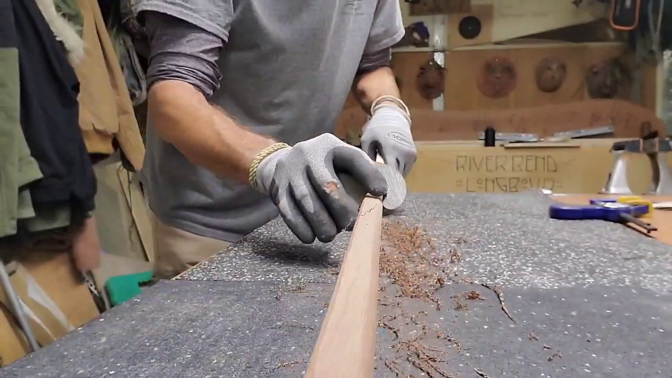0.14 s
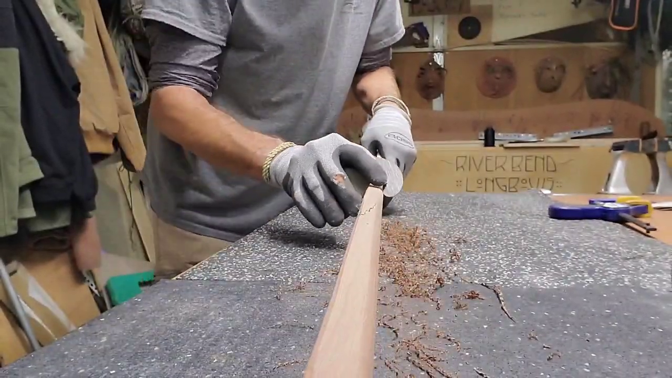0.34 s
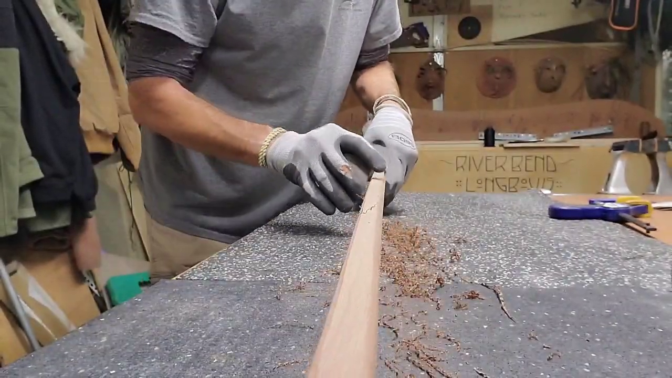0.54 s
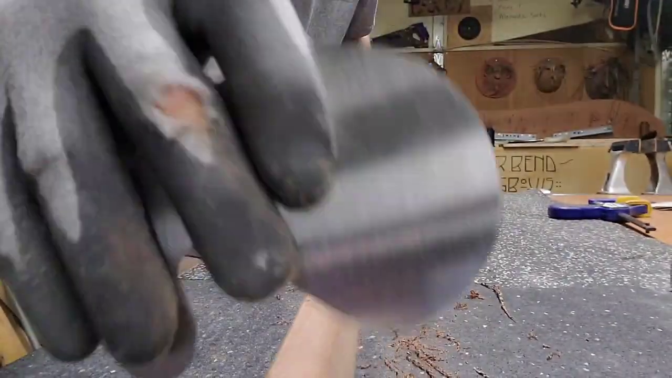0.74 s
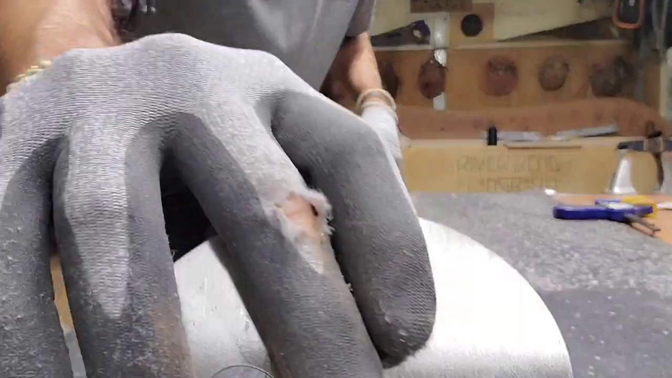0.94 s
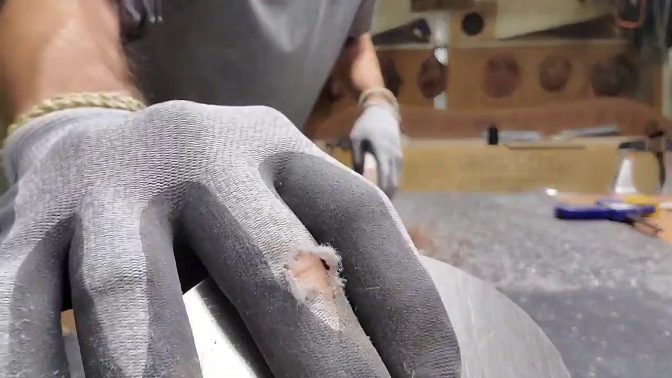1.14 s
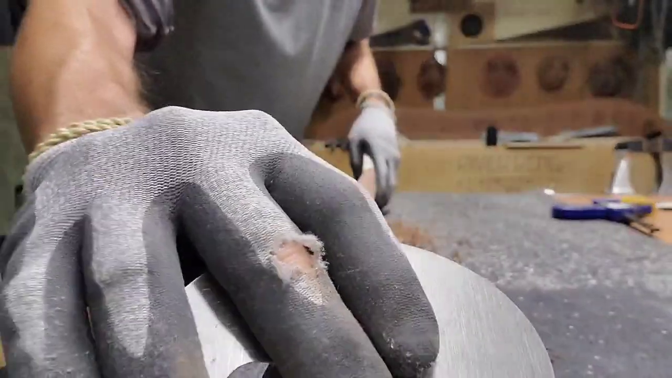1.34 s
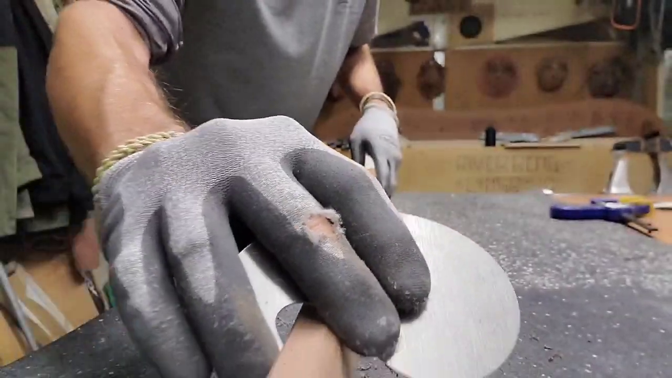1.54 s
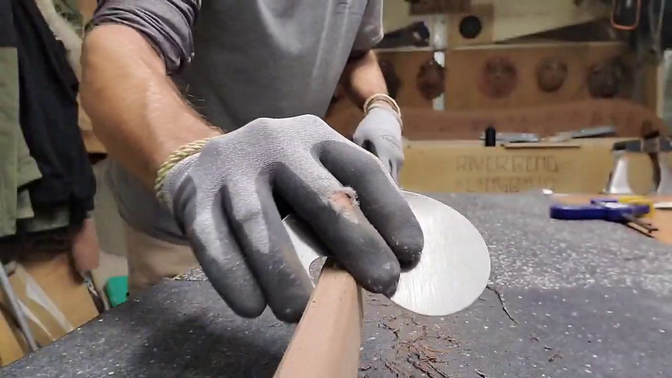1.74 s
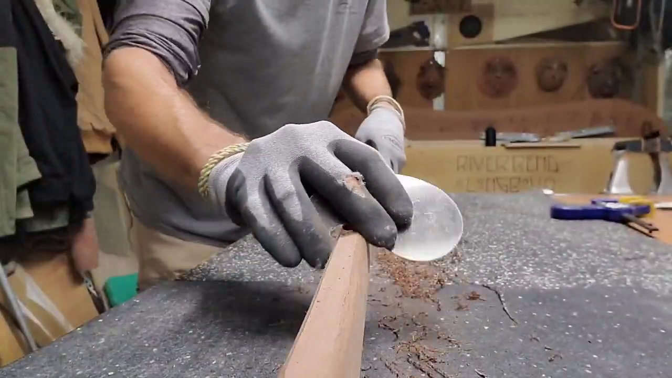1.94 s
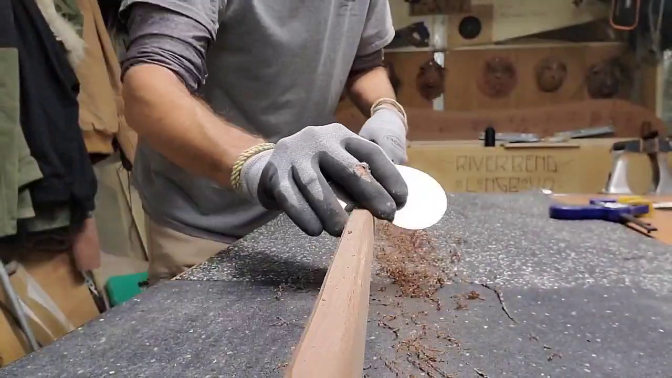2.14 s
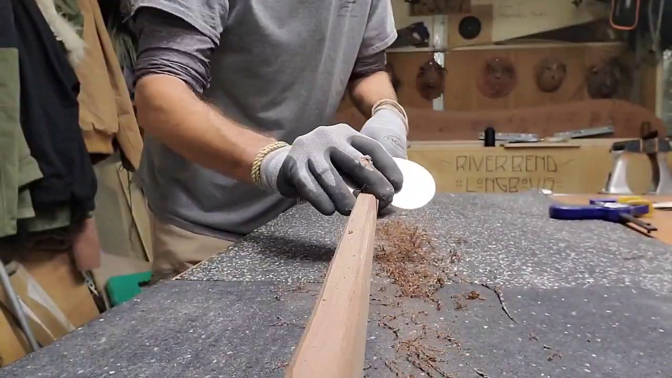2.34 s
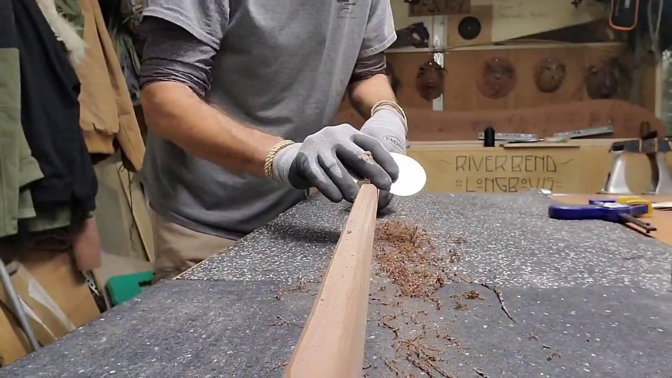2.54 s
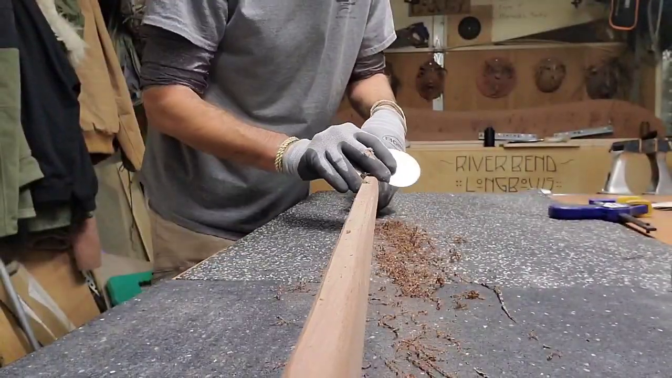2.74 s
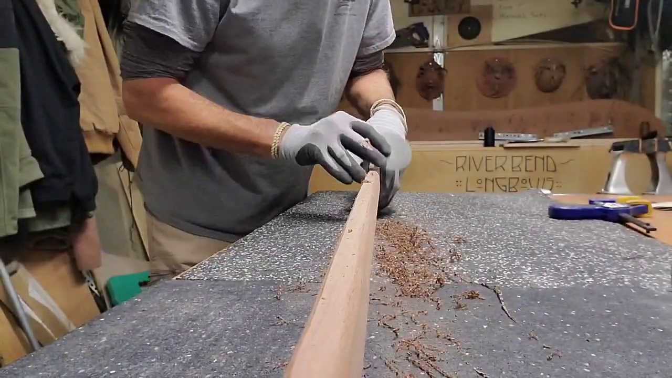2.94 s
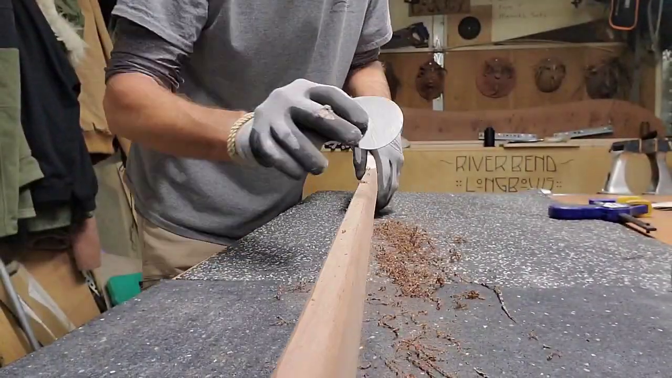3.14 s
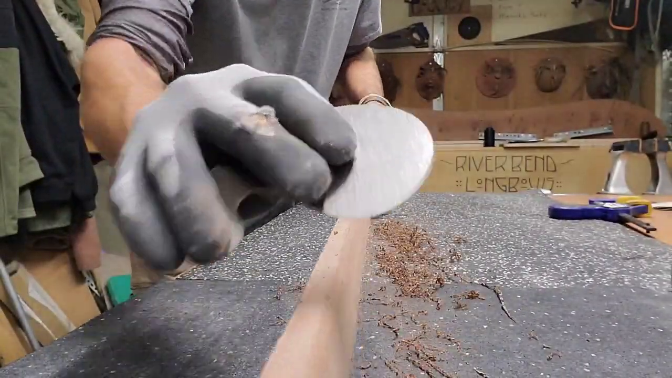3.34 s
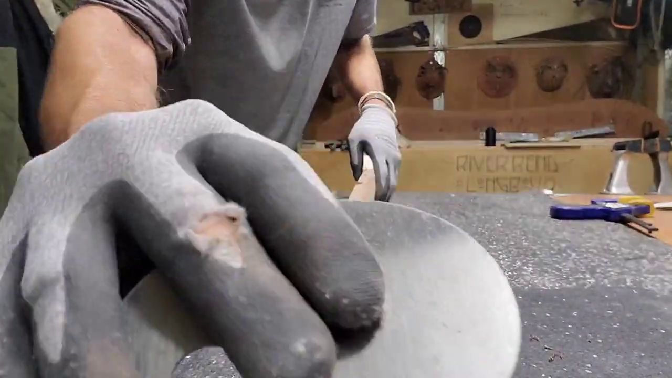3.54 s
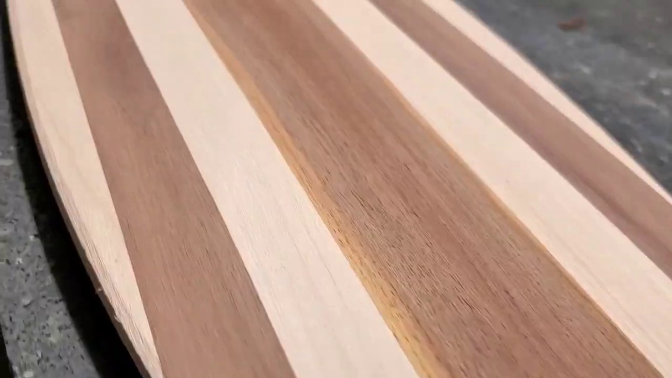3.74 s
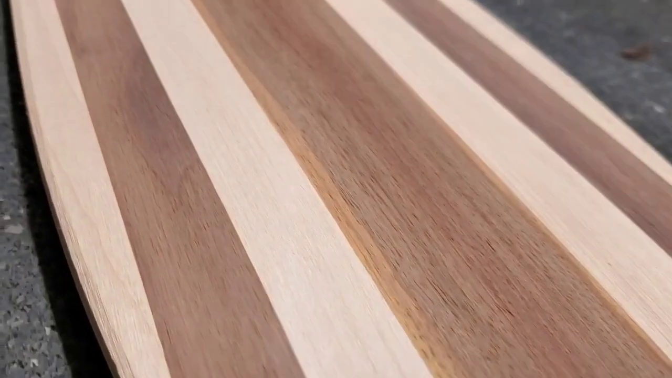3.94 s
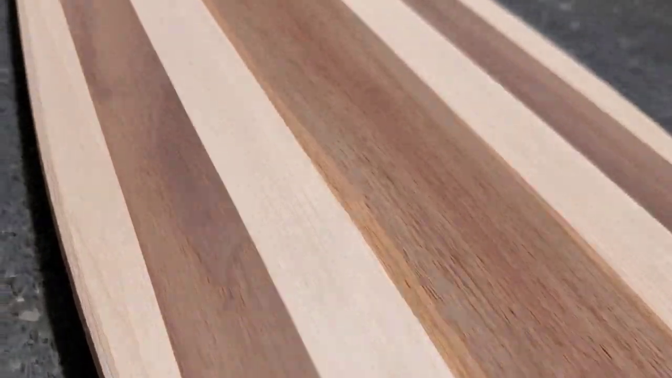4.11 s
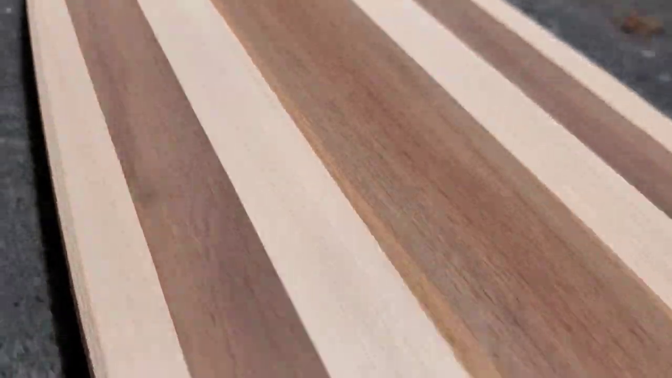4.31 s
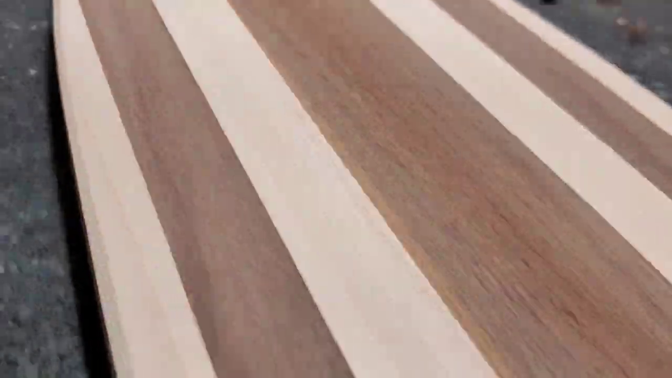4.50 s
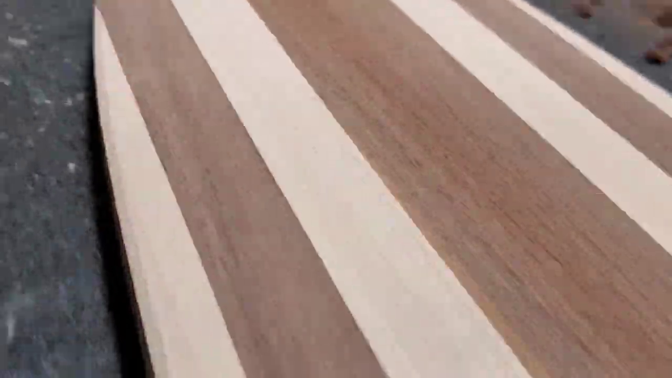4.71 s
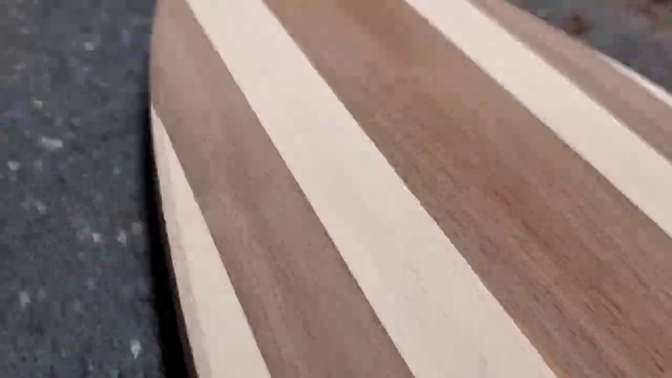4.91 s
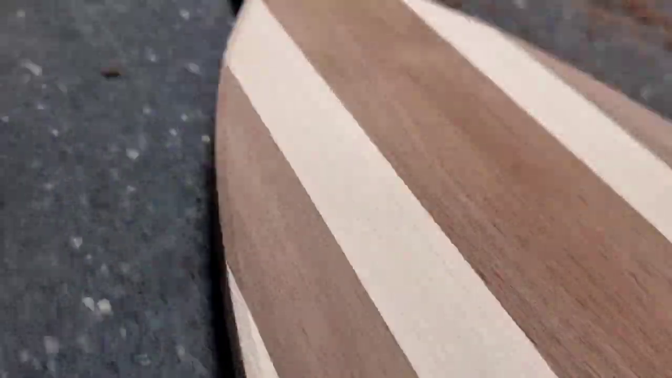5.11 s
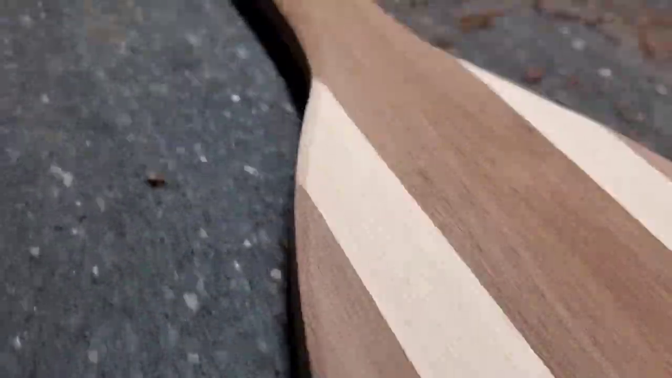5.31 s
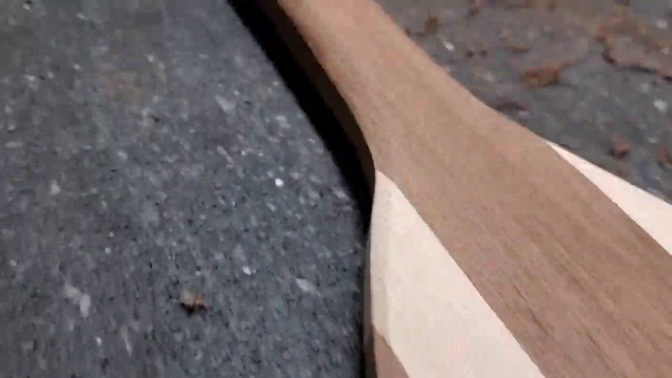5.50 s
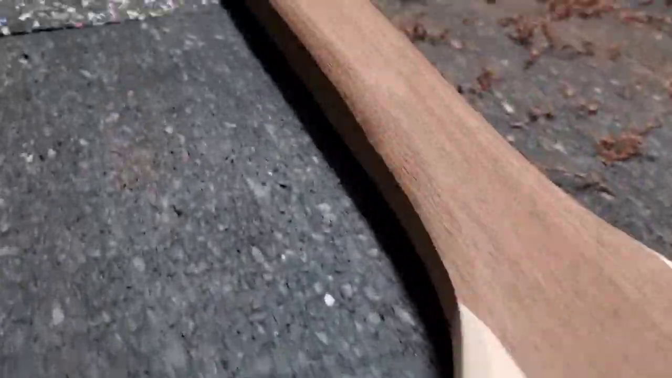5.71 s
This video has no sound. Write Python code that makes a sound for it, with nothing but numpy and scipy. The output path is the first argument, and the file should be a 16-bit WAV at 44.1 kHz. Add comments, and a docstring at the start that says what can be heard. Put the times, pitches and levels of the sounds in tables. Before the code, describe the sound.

Dry, gritty scraping of wood at close range, broken by knocks and ticks, gives way to quiet cloth movement over a steady mains hum.

```python
"""On a workshop bench, a curved steel scraper is drawn twice along a wooden shaft, close to a two-port microphone.
Tearing fibres are jumpy noise: it hisses, rings the bending modes of the shaft and thumps the bench.
Short pushes knock the shaft, gloves rustle as shaped noise, and grit ticks; later only sleeves further off are heard.
A mains hum of wavering tones and a ventilation rumble of shaped noise run throughout; the level dips briefly twice."""
import sys
import numpy as np
from scipy import signal
from scipy.fft import rfft, irfft, next_fast_len
from scipy.io import wavfile
from scipy.ndimage import map_coordinates

SR = 44100
rng = np.random.default_rng(int(sys.argv[2]) if len(sys.argv) > 2 else 0)


def log_audio(samples):
    """Write samples as a 16-bit WAV file to the path given in sys.argv[1]."""
    # one column per channel
    frames = np.atleast_2d(samples).T
    # limit to full scale, then quantise
    limited = np.clip(frames, -1, 1)
    pcm = np.round(limited * 32767).astype(np.int16)
    wavfile.write(sys.argv[1], SR, pcm)


N = 254016

# All table levels are relative: later steps may scale them.
# Ventilation noise: (frequency [Hz], level per Hz [dB])
AIR = [(15, -46), (28, -14), (70, -14.5), (130, -17), (240, -22.5), (400, -25), (650, -26), (1000, -35.5),
       (1500, -40), (3500, -53), (5200, -55.5), (6400, -48.5), (7400, -63.5), (15400, -53.5)]
# Likeness of the air noise at the two ports: (frequency [Hz], likeness [-1 to 1])
AIR_ALIKE = [(60, 0.93), (240, 0.83), (950, -0.68), (3770, 0.0061), (15000, -0.01)]
# Main tone of the mains hum: (time [s], level [dB], left over right [dB])
HUM = [(.0, -48, -15), (1.2, -43.5, -4), (1.45, -43.5, -7), (3.2, -44.5, -6.5), (3.4, -45.5, -7),
       (3.7, -43.5, -4), (3.8, -43.5, 3), (5.07, -44, 3), (5.26, -47.5, 3.5), (5.76, -47, 3.5)]
# Other mains tones: (frequency [Hz], level [dB])
MAINS = [(59.6, -54), (119.5, -63), (240, -65)]
# Cloth sound of sleeves further off: (frequency [Hz], level per Hz [dB])
SLEEVES = [(710, -37), (1200, -6), (3100, -3), (3640, -4), (4760, -2.5), (6700, -2.5), (9520, -15.5),
           (15400, -10)]
# Loudness of those sleeves: (time [s], level [dB])
PASSING = [(3.8, -87), (4.12, -76), (4.3, -79), (4.7, -70), (4.97, -70), (5.328, -58.5), (5.58, -61.5),
           (5.76, -62)]
# Cloth sound of gloves close by: (frequency [Hz], level per Hz [dB])
GLOVES = [(710, -31), (1200, -9), (1710, -8), (2970, -7.5), (3760, -0.5), (4760, -2), (6620, -6),
          (7370, -11), (15400, -7.5)]
# Gloves shifting their grip: (start [s], loudest [s], end [s], level [dB])
GRIPS = [(0.74, 0.873, 1.5, -56), (1.062, 1.225, 1.3, -49.5), (1.332, 1.35, 1.56, -58),
         (1.415, 1.474, 1.2, -49)]
# Grit under glove or blade, and the blade landing: (time [s], level [dB], rise [s per 60 dB], fall [s per 60 dB])
TICKS = [(.827, -39, .004, .025), (1.352, -58, .004, .08), (1.499, -21, .045, .12), (1.511, -21, .06, .015),
         (5.597, -57, .015, .05), (1.556, -30, .02, .1)]
# Blows: (time [s], push level [dB], blade rattle level [dB], hardness [Hz])
KNOCKS = [(.232, -12.5, -58, 310), (1.0755, -17.5, -55, 495), (1.087, -25.5, -74, 497),
          (1.136, -25.5, -65, 439), (1.2088, -16.5, -53, 350), (1.22, -26, -62, 450),
          (1.437, -32, -77, 400), (1.503, -15, -50, 880), (2.5115, -3, -34, 380), (2.519, -5, -40, 380),
          (2.896, -8, -37, 900), (2.906, -8, -39.5, 1090), (3.6841, -8, -38, 452), (3.693, -19, -60, 300),
          (3.709, -20.5, -45, 385), (3.736, -21, -43, 397)]
# Ringing of the steel blade: (frequency [Hz], width [Hz], level [dB])
BLADE_MODES = [(3620, 200, -1.5), (3700, 100, -14.5), (6700, 370, 6), (7780, 43, 14.5)]
# Ringing of the bench: (frequency [Hz], width [Hz], level in a blow [dB])
BENCH_MODES = [(102.1, 22, 0), (150, 63, -2)]
# Bending modes of the shaft: (frequency [Hz], width [Hz], level [dB], place where the blade drives it best [0-1])
SHAFT_MODES = [(247.7, 24, -2, 0.56), (359.6, 15, 3.5, 0.4), (517.8, 40.4, 2, 0.54), (636, 61, -5.5, 0.23),
               (653.4, 96, -9.5, 0.47), (764.4, 40, -8, 0.2), (868, 140, -12, 0.56), (1019, 35, -6, 0.47),
               (1102, 27, -9, 0.43), (1240, 32, -3, .3), (1337, 38, -6, .6), (1600, 170, -15, 0.61),
               (1803, 45, -9.5, 0.57), (2114, 59, -14.5, .4)]
# Level of each bench mode with the blade at mid shaft, one entry a mode: (level [dB])
BENCH_OVER_DB = [1, -3]
# Change of each bench mode from one end of the shaft to the other: (change [dB])
BENCH_TILT_DB = [6, -12]
# The shaft rocking on the bench: (time [s], length [s], lower mode level [dB], upper mode level [dB])
JOLTS = [(.11, 0.028, -24.5, -22), (.25, 0.061, -28, -14.5), (.43, 0.033, -21.5, -23.5),
         (1.472, 0.065, -35, -40), (1.553, 0.053, -38.5, -41), (1.613, 0.065, -25.5, -47),
         (1.899, 0.027, -37, -30), (2.3, 0.07, -34, -34.5), (2.809, 0.14, -26.5, -49),
         (3.04, 0.076, -32, -44)]
# Strokes of the blade: (start [s], end [s], place at start [0-1], place at end [0-1], shaft over pressure [dB],
# bench over pressure [dB], most treble [dB], left lead at start [ms], left lead at end [ms], right shading [0-1])
STROKES = [(0, 0.751, .19, 0.84, 3.8, 1, 0.5, .059, .066, .45),
           (1.6, 3.1, 0.059, 0.83, 4.48, -5, 6, .12, .058, 0.95)]
# Pressure of the blade, one list a stroke: (time [s], level [dB])
PRESSURE = [
    [(0, -23), (.1, -30), (.3, -29.5), (.48, -31), (.622, -30), (.676, -52), (.75, -66)],
    [(1.44, -57), (1.49, -49.5), (1.53, -39), (1.59, -32), (1.625, -27.5), (2.1, -26.5), (2.5, -29),
     (2.62, -31), (2.69, -29), (2.93, -31), (3.062, -33.5), (3.14, -60), (3.2, -64.5)],
]
# Hiss of the tearing fibres: (frequency [Hz], level per Hz [dB])
FIBRES = [(1290, -8.5), (2200, -4.5), (2470, -6.5), (2700, -3), (2930, -5), (3330, -2), (4810, -6),
          (6620, -8), (7420, -16), (8050, -14), (9090, -10), (9710, -12.5), (10800, -11.5), (12600, -17.5),
          (15400, -9)]
# Time for echoes to fall 60 dB: (frequency [Hz], time [s])
WALLS = [(100, 0.31), (1000, 0.17), (5000, 0.15), (15000, 0.15)]
# Shading of the right port by the microphone body: (frequency [Hz], level [dB])
SHADOW = [(100, -6.5), (1000, -0.5), (6500, -3), (8100, -15), (9400, -11), (10400, -9), (11800, -6),
          (15000, -8)]
# Brief dips of the level: (fade starts [s], deepest [s], back to normal [s], depth [dB])
DROPOUTS = [(.7565, .759, .768, -14), (3.7575, 3.773, 3.7895, -34)]

AIR_DB, HUM_HZ = -49, 360.0
GRIP_FADE_DB, STILL_DB = 11, -78  # fall from the loudest moment to either end; rustle of hands at rest
KNOCK_BENCH_DB = -8  # how much of a blow reaches the bench
FACING, TURN_DB = 0.45, 37  # place where the blade faces the microphone; treble lost per squared place away
HISS_DB = 3  # hiss over the pressure
FAR_FROM_S = 3.773  # from here on only the sleeves further off sound over the background
TOP_HZ = 15540  # nothing passes above this


def amp(db):
    """Turn decibels into a plain factor."""
    return 10 ** (np.asarray(db) / 20)


def unit(x):
    """Scale a sound to an average (RMS) strength of one."""
    return x / np.sqrt(np.mean(x ** 2) + 1e-20)


def along(points, hz):
    """Read a (frequency, value) table between its points on a log axis."""
    f, v = np.transpose(points)
    return np.interp(np.log(hz + 1), np.log(f + 1), v)


def curves(rows, outside=None):
    """Give one value per sample for each column after the time."""
    s, *cols = np.transpose(rows)
    t = np.arange(N) / SR
    return np.array([np.interp(t, s, col, outside, outside) for col in cols])


def wobble(rate):
    """A smooth random curve with this many random points a second."""
    knots = rng.standard_normal(int(N * rate / SR) + 4)
    return map_coordinates(knots, [np.arange(N) * rate / SR])


def filtered(x, response):
    """Multiply the spectrum of x by a response that depends on frequency."""
    m = next_fast_len(N + SR // 2)
    hz = np.fft.rfftfreq(m, 1 / SR)
    return irfft(rfft(x, m) * response(hz), m)[..., :N]


def coloured(x, spectrum):
    """Shape x by a table of levels over frequency."""
    return filtered(x, lambda hz: amp(along(spectrum, hz)))


def resonance(centre_hz, width_hz, db):
    """One ringing mode: it answers best at its own pitch and rings longer when narrow."""
    return lambda f: amp(db) * 1j * f * width_hz / (centre_hz ** 2 - f * f + 1j * f * width_hz)


def tearing(grain_db, clump_db):
    """Friction noise, as of fibres letting go: its size jumps from grain to grain and in clumps."""
    size_db = grain_db * wobble(900) + clump_db * wobble(45)
    return unit(rng.standard_normal(N) * amp(size_db))


def workshop():
    """Steady air noise, alike at both ports only in the bass, under a wavering mains hum."""
    def turn(hz):
        return np.arccos(np.clip(along(AIR_ALIKE, hz), -1, 1)) / 2

    # the middle part is shared by both ports, the side part is opposite in them
    mid, side = filtered(rng.standard_normal((2, N)),
                         lambda hz: amp(along(AIR, hz)) * [np.cos(turn(hz)), np.sin(turn(hz))])
    air = amp(AIR_DB + 0.8 * wobble(21)) * unit(np.array([mid + side, mid - side]))
    t = np.arange(N) / SR
    hum_db, pan_db = curves(HUM)
    hum_tone = np.sin(2 * np.pi * HUM_HZ * t + 0.051 * wobble(18))
    hum = np.sqrt(2) * amp(hum_db + 0.25 * wobble(4.9)) * hum_tone
    mains = sum(np.sqrt(2) * amp(db + 2.0 * wobble(0.89)) * np.sin(2 * np.pi * hz * t) for hz, db in MAINS)
    return air + mains + hum * amp([pan_db / 2, -pan_db / 2])


def cloth():
    """Fabric slides over wood and steel and grit ticks; from further off the two ports hear it unalike."""
    fades = [curves([(a, db - GRIP_FADE_DB), (b, db), (c, db - GRIP_FADE_DB)], -120)[0] for a, b, c, db in GRIPS]
    rustle = amp(np.maximum(np.max(fades, axis=0), STILL_DB))
    passing = amp(curves(PASSING)[0])
    t = np.arange(N) / SR
    grit = 0
    for s, db, rise, fall in TICKS:
        time_60db = np.where(t < s, max(rise, 0.002), max(fall, 0.003))
        grit = grit + amp(db - 60 * np.abs(t - s) / time_60db)
    near = unit(coloured(tearing(grain_db=-2.5, clump_db=2.0), GLOVES))
    two_ports = np.array([tearing(grain_db=1.5, clump_db=-2.0) for port in range(2)])
    far = unit(coloured(two_ports, SLEEVES))
    return rustle * near, grit * near, amp(4) * (passing + grit) * far


def knocks():
    """Each blow is a push as short as it is hard; it rings the shaft and bench and rattles the blade."""
    force, rattle = np.zeros(N + SR), np.zeros(N + SR)
    t = np.arange(SR // 5) / SR
    for s, db, blade_db, hard_hz in KNOCKS:
        u = 2 * np.pi * hard_hz * t
        force[round(s * SR):][:len(t)] -= amp(db + 16) * u * np.exp(-u)
        # the rattle falls 60 dB in 0.11 s
        rattle[round(s * SR):][:len(t)] += amp(blade_db - 60 * t / 0.11) * rng.standard_normal(len(t))

    def wood_and_bench(hz):
        shaft = sum(resonance(*mode[:3])(hz) for mode in SHAFT_MODES)
        return shaft + amp(KNOCK_BENCH_DB) * sum(resonance(*mode)(hz) for mode in BENCH_MODES)

    wood = filtered(force[:N], wood_and_bench)
    steel = filtered(rattle[:N], lambda hz: sum(resonance(*mode)(hz) for mode in BLADE_MODES))
    return wood + amp(7) * steel + amp(6.0) * coloured(rattle[:N], SLEEVES)


def blade():
    """Where the blade is and how it sounds at each sample; between strokes it waits at the next start."""
    t = np.arange(N) / SR
    rows = np.array(STROKES)
    current = np.minimum(np.searchsorted(rows[:, 1], t), len(rows) - 1)
    start, end, place0, place1, wood_db, bench_db, treble_db, lead0, lead1, shade = rows[current].T
    done = np.clip((t - start) / (end - start), 0, 1)
    place = place0 + done * (place1 - place0)
    treble_db = treble_db - TURN_DB * (place - FACING) ** 2
    lead_ms = lead0 + done * (lead1 - lead0)
    return place, wood_db, bench_db, treble_db, lead_ms, shade


def bench(pressure_db, place, bench_db):
    """Level of each bench mode: it follows the pressure, shifts with the place, and swells at every jolt."""
    t = np.arange(N) / SR
    steady = amp([pressure_db + bench_db + over + tilt * (place - 0.5)
                  for over, tilt in zip(BENCH_OVER_DB, BENCH_TILT_DB)])
    swells = sum(amp(db)[:, None] * np.exp(-2 * ((t - s) / length) ** 2) for s, length, *db in JOLTS)
    return steady + swells


def ringing(force, place, reach):
    """The blade drives each shaft mode best near one place; neighbouring modes swing in opposite senses."""
    total = 0
    for k, (*mode, best) in enumerate(SHAFT_MODES):
        drive = 0.5 + np.exp(-((place - best) / reach) ** 2)
        total = total + (-1) ** k * filtered(force * drive, resonance(*mode))
    return total


def strokes():
    """Tearing fibres and blade pressure ring the shaft, hiss in the air and thump the bench."""
    pressure_db = np.max([curves(rows, -120)[0] for rows in PRESSURE], axis=0)
    place, wood_db, bench_db, treble_db = blade()[:4]
    # the hand damps the slowest swings
    drag = filtered(tearing(grain_db=3.0, clump_db=1.45), lambda hz: 1j * hz / (1j * hz + 400))
    wood = unit(ringing(drag, place, reach=0.32))
    hiss = unit(coloured(tearing(grain_db=4.5, clump_db=0.24), FIBRES))
    treble = filtered(hiss, lambda hz: 1 / (1 + (8000 / (hz + 1)) ** 8))
    hiss = hiss + (amp(treble_db) - 1) * treble
    push = tearing(grain_db=-0.5, clump_db=-2.5)
    thump = 0
    for level, mode in zip(bench(pressure_db, place, bench_db), BENCH_MODES):
        # squared: a steeper resonance
        thump = thump + level * unit(filtered(push, lambda hz: resonance(*mode)(hz) ** 2))
    return amp(pressure_db + wood_db) * wood, amp(pressure_db + HISS_DB) * hiss, thump


def room(x, count=90):
    """Echoes die at a speed set by their pitch; as things move, the pattern of echoes is renewed."""
    hop, size = N // count + 1, SR // 4
    hz, t, z = signal.stft(rng.standard_normal((count + 1, 2, size)), SR, nperseg=256)
    decay = amp(-60 * t / along(WALLS, hz)[:, None])
    tails = signal.istft(z * decay, SR, nperseg=256)[1][..., :size]
    padded = np.pad(x, (hop + 150, 2 * hop))  # echoes start 150 samples late
    out = np.zeros((2, N + 4 * hop + size))
    window = np.sin(np.pi * np.arange(2 * hop) / (2 * hop))  # overlapping pieces
    for k, tail in enumerate(tails):
        piece = padded[k * hop:][:2 * hop] * window
        echo = signal.fftconvolve(piece[None], tail / np.linalg.norm(tail[0]), axes=1)
        out[:, k * hop:][:, :2 * hop + size - 1] += echo
    return out[:, hop:hop + N]


def ports(direct, far):
    """The left port hears first; walls fill in; the body of the microphone shades the right port."""
    lead_ms, shade = blade()[4:]
    shift = lead_ms * SR / 2000  # half the lead in samples, one way for each port
    shade = np.clip(shade, 0, 1)
    heard = [map_coordinates(direct, [np.arange(N) + side * shift], order=5) for side in (1, -1)]
    pair = np.array(heard) + room(far)
    pair[1] = (1 - shade) * pair[1] * amp(-1.0) + shade * coloured(pair[1], SHADOW)
    return pair


def scene():
    """Close work at the bench gives way to sleeves further off, over the steady workshop sound."""
    wood, hiss, thump = strokes()
    blows = knocks()
    near, grit, far = cloth()
    direct = wood + hiss + thump + blows + near + grit
    to_walls = (amp(-4.5) * wood + amp(2.5) * hiss + amp(-11) * thump
                + amp(-2.5) * blows + amp(4.0) * near + amp(-32) * grit)
    work = ports(direct, to_walls)
    return np.where(np.arange(N) < FAR_FROM_S * SR, work, far) + workshop()


def record(dry):
    """The level dips briefly twice; the microphone loses the deep bass; nothing passes above the band limit."""
    t = np.arange(N) / SR
    gain_db = sum(np.interp(t, [a, a + 0.001, b, c - 0.002, c], [0, 0.6 * db, db, 0.6 * db, 0])
                  for a, b, c, db in DROPOUTS)

    def band(hz):
        low_cut = (1j * hz / (1j * hz + 25)) ** 2
        high_cut = np.sin(np.pi / 2 * np.clip((TOP_HZ - hz) / 120, 0, 1)) ** 2
        return low_cut * high_cut

    return filtered(dry * amp(gain_db), band)


dry = scene()
out = record(dry)
log_audio(out)
```